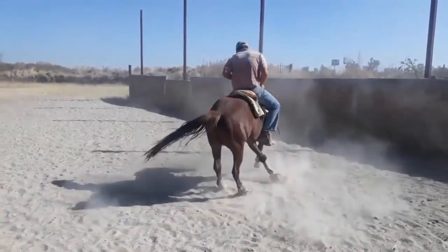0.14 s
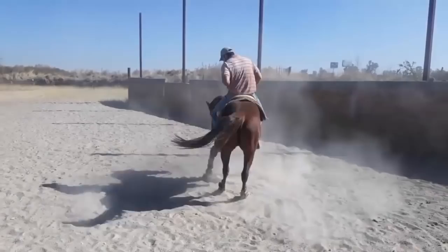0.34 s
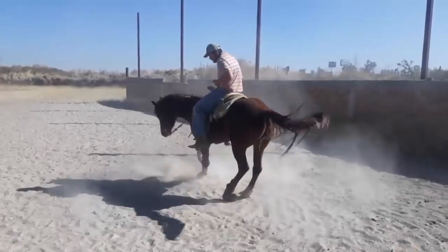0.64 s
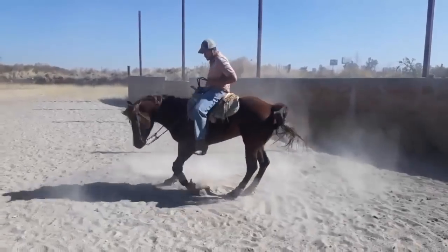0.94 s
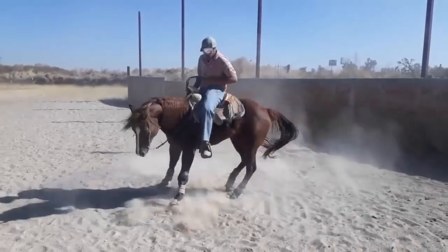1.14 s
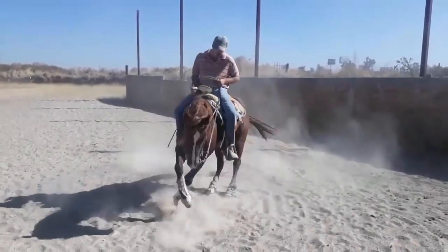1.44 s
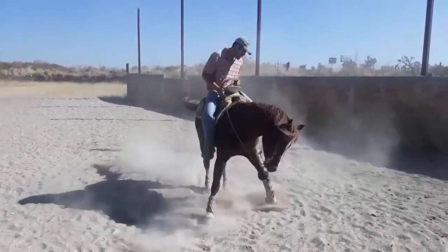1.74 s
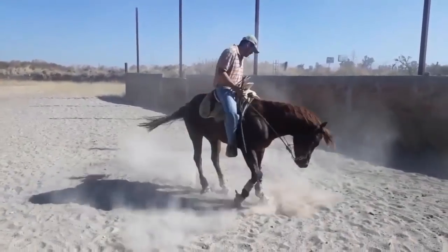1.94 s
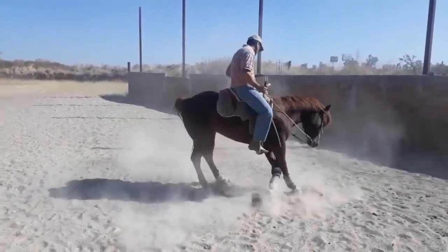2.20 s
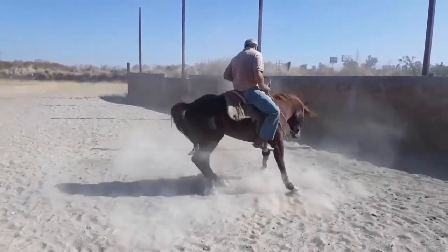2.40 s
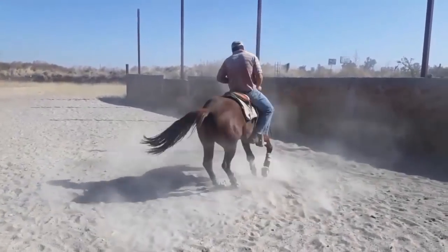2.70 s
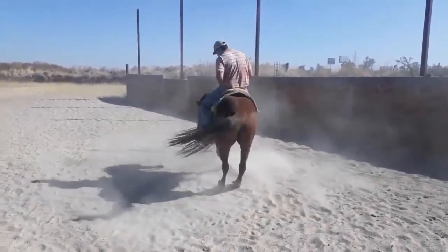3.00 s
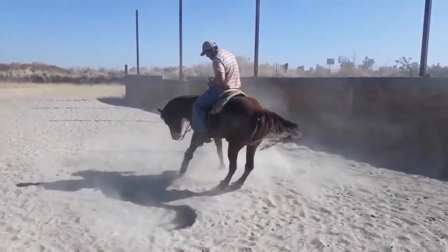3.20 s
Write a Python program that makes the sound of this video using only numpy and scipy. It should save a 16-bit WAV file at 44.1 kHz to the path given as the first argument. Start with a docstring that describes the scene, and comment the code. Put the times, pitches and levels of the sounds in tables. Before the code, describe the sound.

Hooves pound and drag through loose sand in irregular clusters, with short crunches and brief scrapes between. Open arena with a slight dull wall echo; quiet air and hiss, occasional deep rumble, and a small bird chirping five times.

```python
"""A ridden horse spins on the spot in a sandy outdoor arena, beside a wall.
Filtered noise makes faint outdoor air, hiss and a swelling deep rumble; a gliding tone is a bird's two-part chirp.
Throughout, hooves push sand aside (filtered grains), knock on clods (damped modes and crunch noise) and thud
into the ground (short sagging tones), with brief scrapes over grit (resonant grains) among them.
The wall returns a dull echo."""
import sys
import numpy as np
from scipy import signal
from scipy.fft import rfft, irfft
from scipy.io import wavfile
from scipy.ndimage import uniform_filter1d

SR = 44100
rng = np.random.default_rng(int(sys.argv[2]) if len(sys.argv) > 2 else 0)


def store_wav(level_fs):
    """Save 16-bit WAV to argv[1]."""
    pcm = np.round(np.clip(np.atleast_2d(level_fs), -1, 1) * 32767)
    wavfile.write(sys.argv[1], SR, pcm.T.astype(np.int16))


N = 147735
TIME = np.arange(N) / SR
GRAINS_PER_S, GRAIN_SPREAD_DB = 3800, 2


def from_db(db):
    """Decibels to gain."""
    return 10 ** (np.asarray(db) / 20)


def rms_one(x):
    """Scale to rms 1."""
    return x / np.sqrt(np.mean(x ** 2) + 1e-20)


def at_hz(points, hz):
    """Read a table on a log-frequency axis."""
    point_hz, values = np.transpose(points)
    return np.interp(np.log(hz + 1), np.log(point_hz), values)


def colour(x, spectrum):
    """Minimum-phase filter of unit power gain; falls 20 dB per octave beyond the table's ends."""
    size = 4096
    hz = np.arange(size // 2 + 1) * SR / size + 1
    octaves_below = np.maximum(np.log2(spectrum[0][0] / hz), 0)
    octaves_above = np.maximum(np.log2(hz / spectrum[-1][0]), 0)
    level_db = at_hz(spectrum, hz) - 20 * (octaves_below + octaves_above)
    # folding the cepstrum makes the response causal
    cepstrum = irfft(np.log(from_db(level_db)))
    cepstrum[1:size // 2] *= 2
    cepstrum[size // 2 + 1:] = 0
    response = irfft(np.exp(rfft(cepstrum)))
    return signal.fftconvolve(x, response / np.linalg.norm(response))[:N]


def low_pass(x, cutoff_hz):
    """Second-order Butterworth low-pass."""
    return signal.sosfilt(signal.butter(2, cutoff_hz, fs=SR, output="sos"), x)


def grains(per_s, spread_db):
    """Random clicks of uneven size and either sign; rms 1."""
    size_db = spread_db * np.minimum(rng.exponential(1, N), 4)
    sizes = from_db(size_db) * rng.choice([-1, 1], N)
    return rms_one(sizes * (rng.random(N) < per_s / SR))


def add(out, start_s, sound):
    """Mix a sound in at a time."""
    i = max(int(start_s * SR), 0)
    out[i:i + len(sound)] += sound[:N - i]


def background():
    """Steady noise: outdoor air common to both sides, and hiss that partly differs between them."""
    # outdoor air: hz, relative_db_per_hz
    air_spectrum = [(40, 1.5), (100, 9), (250, 8.5), (400, 2), (700, 4), (1500, -6.5), (3000, -15),
                    (5000, -23), (9000, -32.5)]
    # hiss: hz, relative_db_per_hz
    hiss_spectrum = [(500, -30), (2000, 2), (4500, 3), (7000, 0.5), (10000, -4.5), (12000, -2),
                     (14500, 3.5), (16000, -1.5)]
    # left-right correlation of the hiss: hz, correlation (0 to 1)
    likeness = [(1000, 1), (8000, 0.055), (11000, 0.1), (14000, .65)]
    air_db, hiss_db = -33.5, -51
    air, mid, side = rng.standard_normal((3, N))
    alike = at_hz(likeness, np.fft.rfftfreq(N, 1 / SR))
    mid = irfft(rfft(colour(mid, hiss_spectrum)) * np.sqrt((1 + alike) / 2), N)
    side = irfft(rfft(colour(side, hiss_spectrum)) * np.sqrt((1 - alike) / 2), N)
    hiss = np.array([mid + side, mid - side])
    return from_db(air_db) * colour(air, air_spectrum) + from_db(hiss_db) * hiss


def rumble():
    """Low-frequency noise that swells and fades symmetrically about each peak."""
    # swells of deep rumble: peak_s, level_db
    swells = [(.02, -23), (.90, -33), (1.10, -32), (2.279, -29)]
    # rumble: hz, relative_db_per_hz
    spectrum = [(30, -19), (45, 5.5), (70, -1), (105, -0.5), (160, -14.5)]
    half_gain_s = 0.038  # from a peak to half its gain
    peak_s, level_db = np.transpose(swells)[:, :, None]
    level = (from_db(level_db) / (1 + ((TIME - peak_s) / half_gain_s) ** 2)).sum(axis=0)
    return level * colour(rng.standard_normal(N), spectrum)


def bird():
    """A gliding whistle in two syllables, made raspy by pitch flutter and smeared by a decaying noise tail."""
    # bird calls: start_s, level_db
    chirps = [(0.075, -36), (.954, -38), (1.83, -35.5), (2.55, -33), (3.211, -31.5)]
    # glide and loudness of one call: time_from_start_s, pitch_hz, relative_level_db
    shape = [(0, 3490, -20), (0.009, 4910, -15.5), (.019, 3880, -5.5), (0.035, 3420, -5),
             (0.041, 3730, -7.5), (.052, 2920, -29), (0.066, 3280, -3.5), (0.069, 3560, -3.5),
             (.075, 4420, -7), (0.082, 3220, -2), (.088, 3180, -6.5), (.095, 3660, -24)]
    flutter_share = 0.02  # rms, as a share of the pitch
    wet_db, tail_t60_s = -5, 0.13
    shape_s, pitch_hz, shape_db = np.transpose(shape)
    out, t = np.zeros(N), TIME[:int(shape_s[-1] * SR)]
    for start_s, level_db in chirps:
        wander = rms_one(uniform_filter1d(rng.standard_normal(len(t)), size=30))
        hz = np.interp(t, shape_s, pitch_hz) * (1 + flutter_share * wander)
        level = from_db(level_db + np.interp(t, shape_s, shape_db))
        add(out, start_s, level * np.sin(2 * np.pi * np.cumsum(hz) / SR))
    tail = rng.standard_normal(SR // 2) * from_db(-60 * TIME[:SR // 2] / tail_t60_s)
    wet = signal.fftconvolve(out, tail / np.linalg.norm(tail))[:N]
    return out + from_db(wet_db) * wet


def sand():
    """Each hoof drag builds up and dies away exponentially, spraying clumps of grains and churning soft clods."""
    # hoof drags: hardest_push_s, rise_time_constant_s, fall_time_constant_s, relative_spray_db, relative_soil_db
    scuffs = [(0.097, 0.015, 0.035, -29, -34), (.31, 0.059, 0.064, -34, -26.5),
              (0.586, 0.048, 0.01, -35, -32.5), (0.892, 0.023, 0.045, -26.5, -23),
              (0.954, 0.045, 0.24, -34, -35.5), (1.205, 0.012, 0.13, -39, -33.5),
              (1.41, 0.13, 0.36, -36, -41), (1.661, 0.03, 0.048, -31.5, -22),
              (1.831, 0.02, 0.054, -26.5, -23), (1.929, 0.025, 0.083, -33, -39.5),
              (2.286, 0.13, 0.18, -38, -29), (2.64, 0.05, 0.049, -33.5, -29),
              (2.88, 0.061, 0.056, -36.5, -38), (3.047, 0.14, 0.17, -35, -32)]
    # sprayed sand: hz, relative_db_per_hz
    spray_spectrum = [(250, -18), (400, -10.5), (600, 7.5), (900, 0), (1500, -2.5), (2500, -16.5),
                      (4000, -19.5), (7000, -37), (14000, -43)]
    # dull churning of the soil: hz, relative_db_per_hz
    soil_spectrum = [(50, -14), (90, -0.5), (170, -1.5), (270, -1), (370, -11.5), (600, -33.5)]
    spray_gain_db, soil_gain_db = 0.5, 5
    clump_s, patchy_db = 0.013, 2.5  # smoothing length and rms depth of the clumping
    clods_per_s, clod_spread_db = 600, 1.63
    peak_s, rise_s, fall_s, spray_db, soil_db = np.transpose(scuffs)[:, :, None]
    distance = np.maximum((peak_s - TIME) / rise_s, (TIME - peak_s) / fall_s)
    push = np.exp(-np.minimum(distance, 20))
    # overlapping drags add in power
    spray_level = np.linalg.norm(push * from_db(spray_db), axis=0)
    soil_level = np.linalg.norm(push * from_db(soil_db), axis=0)
    clumps = rms_one(uniform_filter1d(rng.standard_normal(N), int(clump_s * SR)))
    spray_level = spray_level * from_db(spray_gain_db + patchy_db * clumps)
    spray = colour(grains(GRAINS_PER_S, GRAIN_SPREAD_DB) * spray_level, spray_spectrum)
    clods = grains(clods_per_s, clod_spread_db)
    soil = colour(clods * soil_level * from_db(soil_gain_db), soil_spectrum)
    return spray + soil


def knocks():
    """A hoof edge meets packed sand: the damped hoof rings and a pinch of sand is crushed."""
    # contacts: start_s, relative_knock_db, relative_crunch_db
    contacts = [(0.098, -19.5, -22), (.276, -10, -23), (.279, -2, -31), (.300, -5.5, -23), (0.89, -15, -21),
                (1.185, -20, -31.5), (1.398, -15, -21.5), (1.538, -17.5, -25.5), (1.637, -8, -19.5),
                (1.641, -11.5, -31), (1.8682, -13, -16), (2.114, -23, -18), (2.12, -32, -25),
                (2.207, -24, -32), (2.264, -13, -26), (2.595, -13.5, -19.5), (2.637, -9, -20),
                (2.656, -19, -22.5), (2.8399, -1.5, -24.5), (2.859, -28, -21), (2.97, -11.5, -36),
                (3.153, -15, -27.5)]
    # hoof on sand, before random variation: pitch_hz, relative_level_db, t60_s
    hoof_modes = [(542, -2, 0.041), (722, -1, 0.029)]
    # crushed sand: hz, relative_db_per_hz
    crunch_spectrum = [(400, -10), (900, 8.5), (1500, 1), (2200, -3), (3300, -23), (6000, -31),
                       (14000, -39)]
    knock_gain_db, crunch_gain_db, crunch_t60_s = -5.5, -4.5, 0.047
    level_sd_db, pitch_sd_share = 2.5, 0.11
    out, crush, t = np.zeros(N), np.zeros(N), TIME[:SR // 10]
    pitch_hz, mode_db, t60_s = np.transpose(hoof_modes)[:, :, None]
    for start_s, knock_db, crunch_db in contacts:
        level_chance, pitch_chance = rng.standard_normal((2, len(pitch_hz), 1))
        hz = pitch_hz * (1 + pitch_sd_share * pitch_chance)
        level = from_db(mode_db + level_sd_db * level_chance - 60 * t / t60_s)
        ring = (level * np.sin(2 * np.pi * hz * t)).sum(axis=0)
        add(out, start_s, -from_db(knock_db + knock_gain_db) * ring)
        add(crush, start_s, from_db(crunch_db + crunch_gain_db - 60 * t / crunch_t60_s))
    return out + colour(crush * rng.standard_normal(N), crunch_spectrum)


def thuds():
    """Loaded ground swells and dies within a few cycles, sagging in pitch, over a slower, deeper give."""
    # hoof loads: start_s, level_db, settled_pitch_hz
    loads = [(.237, -10, 131), (0.2763, 0, 221), (0.301, -21, 231), (0.348, -15.5, 230), (.491, -17, 184),
             (0.7768, -13.5, 153), (0.901, -17.5, 201), (.953, -14, 177.8), (1.041, -21.5, 245),
             (1.193, -11.5, 192), (1.641, -3.5, 208), (1.649, -6.5, 170), (1.67, -7.5, 201),
             (1.694, -10, 222), (1.829, -8.5, 188), (1.846, -12, 204.4), (2.261, -13, 258),
             (2.395, -13, 197), (2.421, -18.5, 193), (2.469, -17.5, 164), (2.841, -0.5, 217),
             (2.866, -10.5, 230), (2.914, -16, 184), (2.936, -16, 107), (3.051, -15.5, 230),
             (3.074, -12.5, 157), (3.29, -15, 190)]
    rise_s, sag_share = 0.00509, 0.047  # time to peak; share by which the pitch starts high
    weight_hz, weight_db, weight_rise_s = 116, -21.5, 0.0094  # weight_db is relative to each thud
    out, t = np.zeros(N), TIME[:SR // 6]
    u, v = t / rise_s, t / weight_rise_s
    swell = (u * np.exp(1 - u)) ** 2
    weight_swell = from_db(weight_db) * (v * np.exp(1 - v)) ** 2
    weight = weight_swell * np.sin(2 * np.pi * weight_hz * t)
    for start_s, level_db, hz in loads:
        # the phase is zero at the peak of the swell
        cycles = hz * rise_s * (u - 1 + sag_share * (np.exp(-1) - np.exp(-u)))
        add(out, start_s, from_db(level_db) * (weight - swell * np.cos(2 * np.pi * cycles)))
    return out


def scrapes():
    """A hoof edge scrapes briefly over grit: dense grains excite a resonance at each rasp's own pitch."""
    # scrapes: middle_s, half_length_s (to 1/e), level_db, pitch_hz
    rasps = [(.597, 0.019, -38, 1860), (1.398, .004, -26.5, 1590), (1.459, 0.0045, -38, 1650),
             (1.573, 0.0056, -33.5, 2000), (1.921, 0.0093, -33.5, 2060), (2.282, 0.036, -43.5, 2520),
             (2.844, 0.0015, -28, 1900), (2.971, 0.0054, -32, 1740)]
    q = 3  # pitch over bandwidth
    out, grit = np.zeros(N), grains(GRAINS_PER_S, GRAIN_SPREAD_DB)
    for middle_s, half_s, level_db, hz in rasps:
        rasp = signal.lfilter(*signal.iirpeak(hz, q, fs=SR), grit)
        rasp = rms_one(low_pass(rasp, 2 * hz))
        out += from_db(level_db) * np.exp(-((TIME - middle_s) / half_s) ** 2) * rasp
    return out


def wall_echo(horse):
    """The wall returns the hoof sounds late, weaker and duller."""
    delay_s, level_db, cutoff_hz = 0.022, -15.5, 2480
    delayed = np.interp(TIME - delay_s, TIME, horse, left=0)
    return from_db(level_db) * low_pass(delayed, cutoff_hz)


def scene():
    """The horse in the centre with its wall echo, the rumble, the bird and the stereo background."""
    horse = sand() + knocks() + thuds() + scrapes()
    return background() + rumble() + bird() + horse + wall_echo(horse)


def record(dry):
    """Peaks overload softly towards full scale, then a steep low-pass cuts the top."""
    cutoff_hz, ripple_db, stop_db = 15800, 0.1, 80
    clipped = dry / (1 + dry ** 8) ** (1 / 8)
    top_cut = signal.ellip(12, ripple_db, stop_db, cutoff_hz, fs=SR, output="sos")
    return signal.sosfilt(top_cut, clipped)


dry = scene()
out = record(dry)
store_wav(out)
```